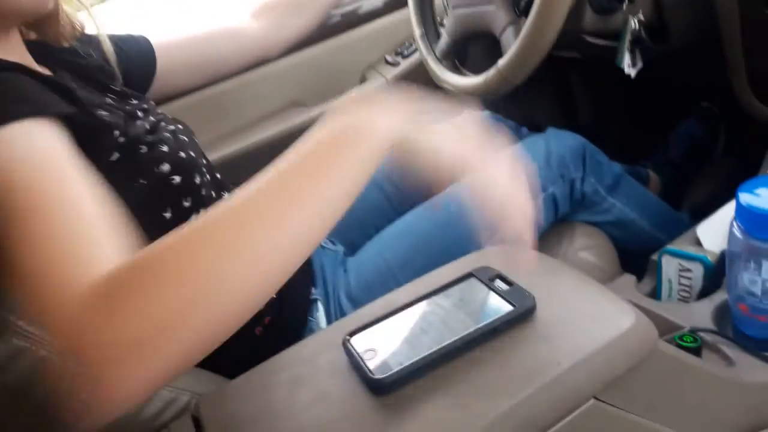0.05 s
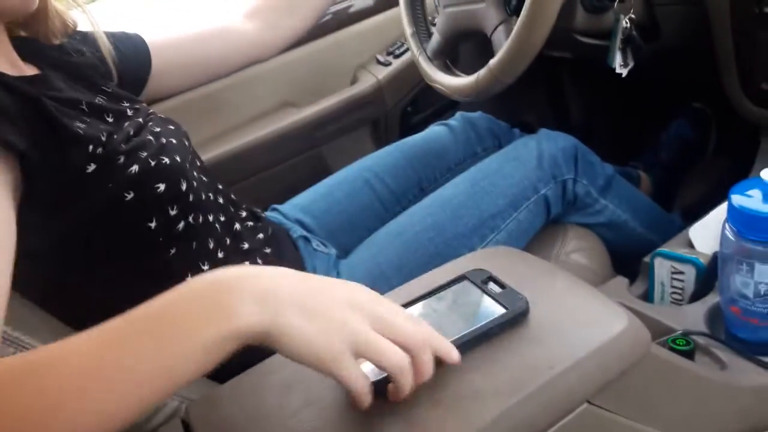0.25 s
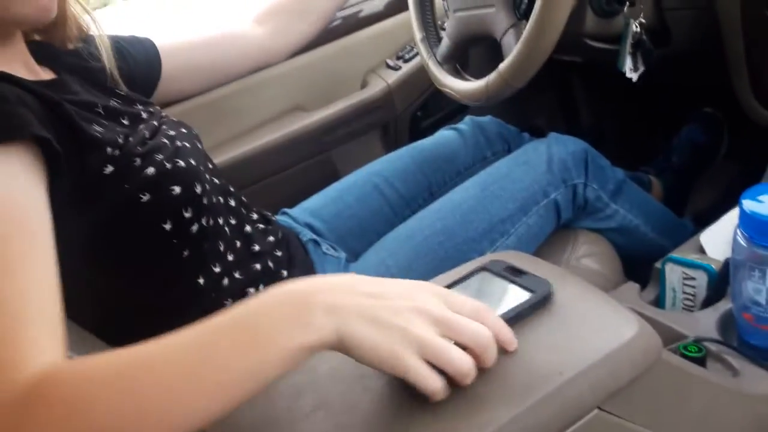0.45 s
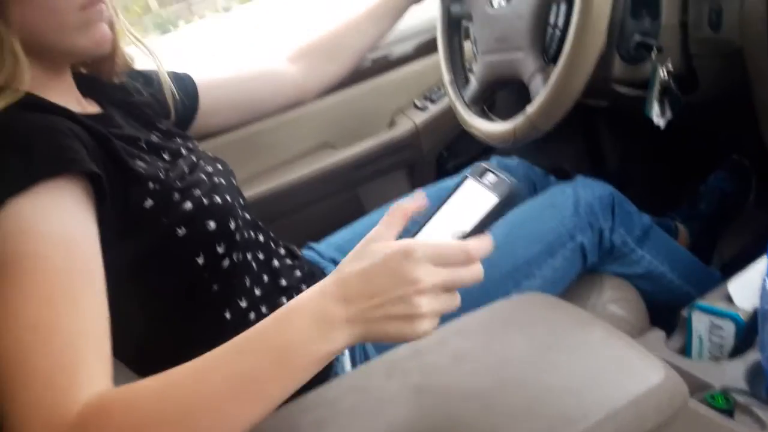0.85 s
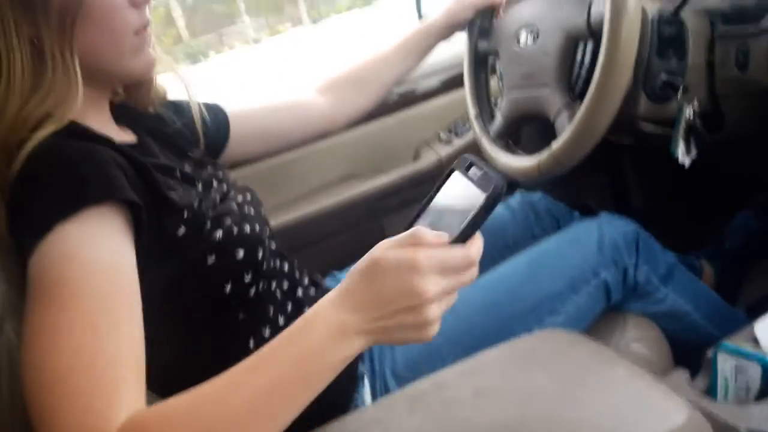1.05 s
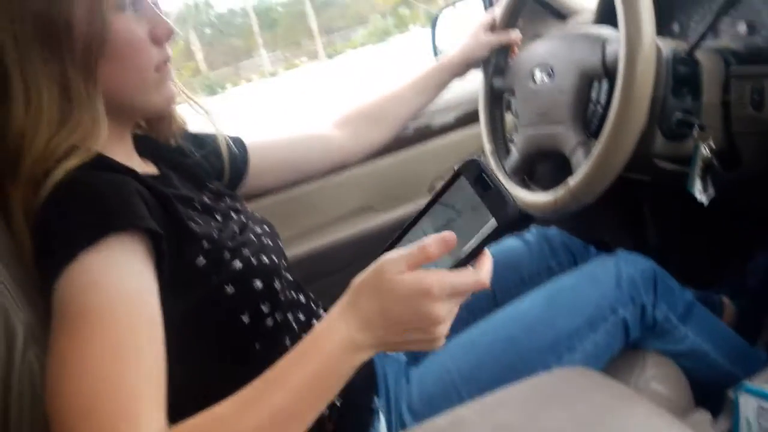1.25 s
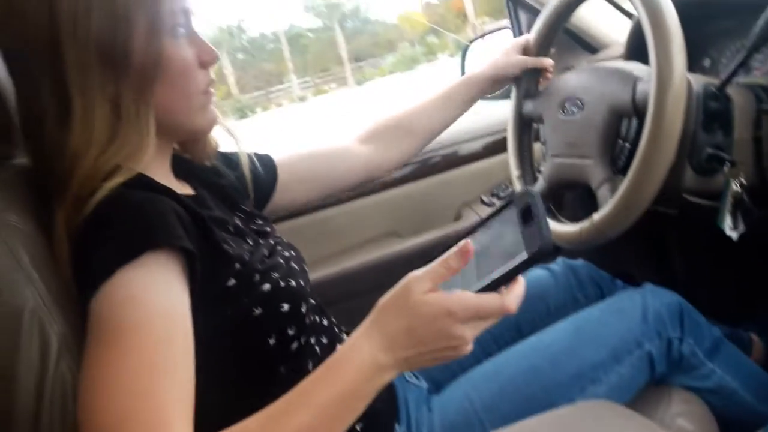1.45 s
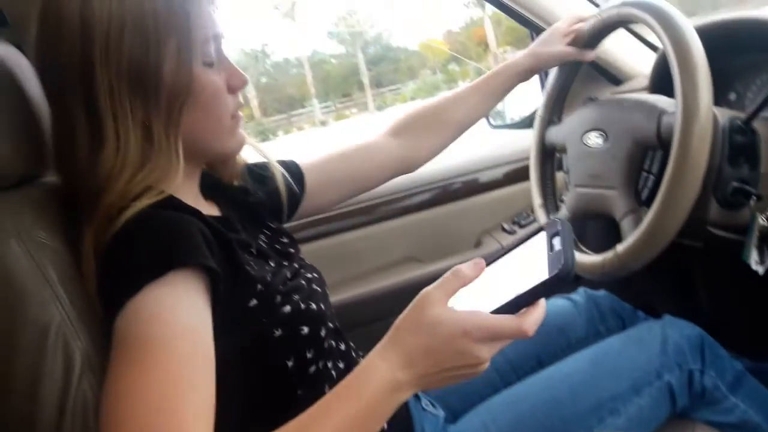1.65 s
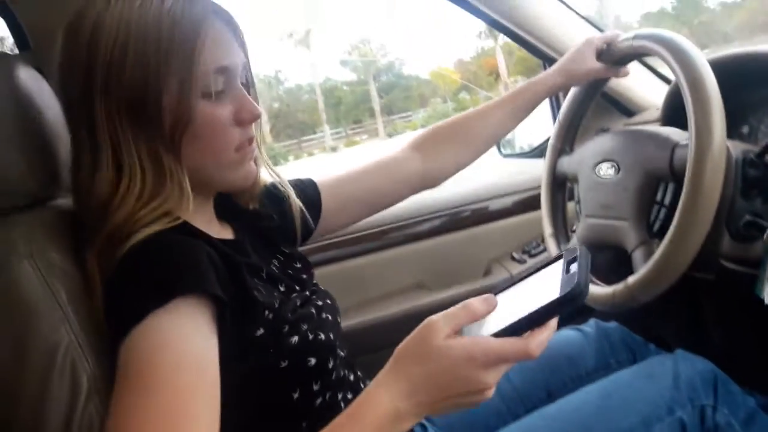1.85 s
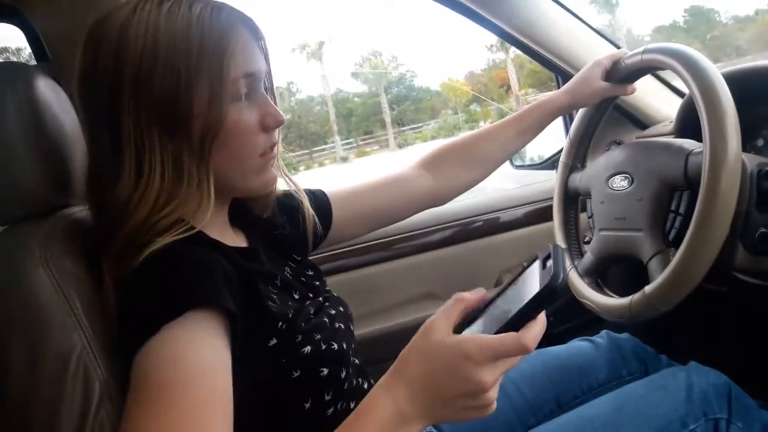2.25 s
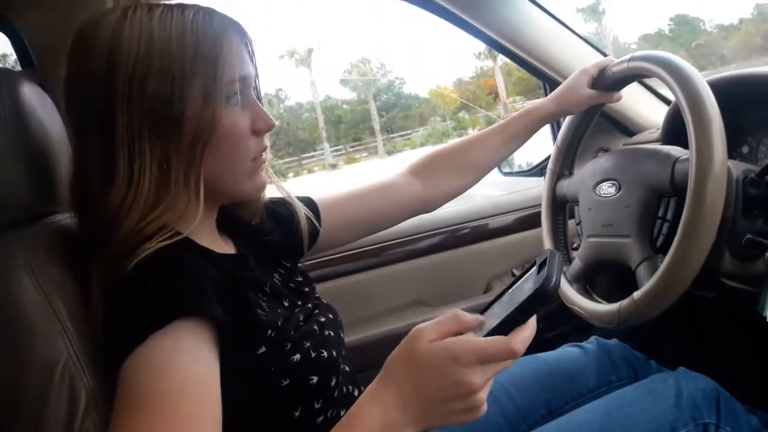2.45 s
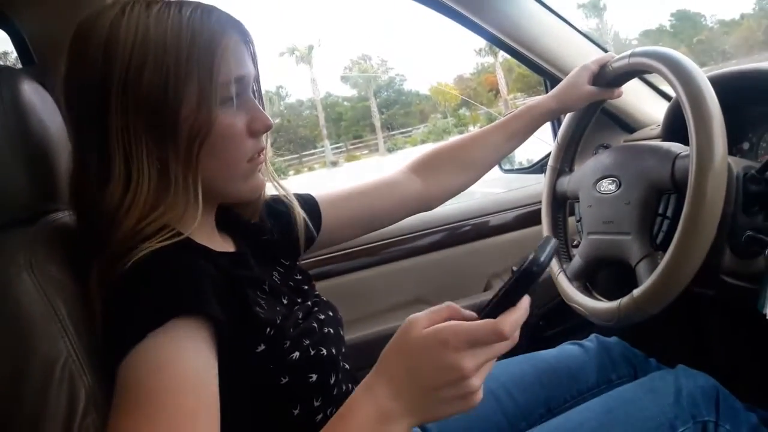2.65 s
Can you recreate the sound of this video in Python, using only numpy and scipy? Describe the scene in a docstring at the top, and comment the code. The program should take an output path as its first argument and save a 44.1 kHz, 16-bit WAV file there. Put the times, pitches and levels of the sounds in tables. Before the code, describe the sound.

A phone is handled close by inside a moving car. At 0.3 seconds a hand lands on it with a dull thud, dragging it in short scrapes across a padded console and lifting it with a bump near 0.8. Faint hollow bumps follow, then plastic clicks and a knock around 1.6 and more clicks at 2.1. Three light taps come from 2.4 to 2.8. Engine drone and road rumble continue underneath.

```python
"""A phone handled on the padded console lid of a moving car, heard close by on a stereo microphone.
A hand lands on it, drags it in sticking jerks and lifts it off with a bump.
The plastic case creaks and clicks in the grip, then a thumb taps it three times.
Behind it the engine drones under road rumble; the small, soft cabin adds only brief reflections."""
import sys
import numpy as np
from scipy import signal
from scipy.fft import rfft, irfft
from scipy.io import wavfile
from scipy.ndimage import uniform_filter1d

SR = 44100
rng = np.random.default_rng(int(sys.argv[2]) if len(sys.argv) > 2 else 0)


def transcribe(signal):
    """Save signal, clipped to [-1, 1], as a 16-bit WAV file at the path in sys.argv[1]."""
    frames = np.atleast_2d(signal).T
    limited = np.clip(frames, -1, 1)
    pcm = np.round(limited * 32767).astype(np.int16)
    wavfile.write(sys.argv[1], SR, pcm)


N = 123479
T = np.arange(N) / SR
HZ = np.maximum(np.fft.rfftfreq(N, 1 / SR), 1)


# low thuds of the padding (t/s, level/dB, f/Hz, t60/s)
LID_THUDS = [(0.3, -15, 80, 0.15), (0.324, -23, 119.1, 0.32), (0.392, -25, 233, .055),
             (0.405, -30, 99.4, 0.14), (0.496, -34, 99, 0.53), (0.661, -24, 146.8, 0.098),
             (0.7647, -16, 140, 0.045), (0.7722, -13, 130, 0.11), (0.81, -23, 106.3, 0.11),
             (1.664, -15, 127, 0.031)]
# knocks of hand and phone (t/s, lid level/dB, phone level/dB, hardness/dB per octave)
LID_KNOCKS = [(0.2894, -32, -44.5, 17.5), (.303, -30.5, -42, -16), (.308, -36, -48, -2),
              (.32, -28, -46, -7), (0.329, -26, -52, -2.5), (0.346, -46, -41.5, 2), (0.362, -34.5, -50, -1),
              (.395, -33, -52, 6.5), (.404, -22.5, -33, -3), (.489, -30, -44.5, 0.5),
              (0.664, -35, -59, 3.5), (0.7593, -36, -34, 23.5), (0.7638, -29.5, -63, -1.5),
              (0.7713, -57, -49, 31), (0.784, -54, -49, 26), (1.663, -38.5, -46, 2)]
# modes of the hollow lid (f/Hz, level/dB, t60/s)
LID_MODES = [(176, 5, 0.024), (255, 0.5, 0.051), (358, -8.5, 0.053), (449, -0.5, 0.019), (572, -7.5, 0.023),
             (707, -14.5, 0.02)]
# modes of the phone knocking on it (f/Hz, level/dB, t60/s)
PHONE_MODES = [(685, 10, 0.009), (990, 2, 0.019), (1122, -1.5, 0.034), (1240, -11, 0.039),
               (1408, -8, 0.034), (1530, -8.5, 0.031), (1940, -35, 0.037), (2740, -31.5, 0.0082)]

def phone_on_lid():
    """The padded lid thuds and rings hollow; the phone clacks against it."""
    thuds, knocks = np.zeros((2, N))
    for start, db, hz, t60 in LID_THUDS:
        add(thuds, start, soft_blow(db, hz, t60, rise_s=0.0042))
    for start, lid_db, phone_db, hardness in LID_KNOCKS:
        hollow = undb(lid_db) * ring(LID_MODES, scatter=0.055, tilt_db=hardness)
        clack = undb(phone_db) * ring(PHONE_MODES, scatter=0.008, tilt_db=hardness)
        add(knocks, start, hollow + clack)
    low_cut = signal.butter(2, 55, "high", fs=SR, output="sos")
    return signal.sosfilt(low_cut, thuds) + cabin(knocks)


# slides of phone and fingers (t/s, length/s, level/dB, tilt/dB per octave)
SLIDE_STROKES = [(0.291, 0.1, -48, 2.5), (0.348, 0.048, -51.5, 6), (0.477, 0.034, -47.5, 4),
                 (0.516, 0.19, -60.5, 7), (0.656, 0.03, -62.5, 6), (0.722, 0.083, -57.5, 5.5),
                 (1.552, 0.22, -63.5, 5.5), (1.749, 0.056, -67.5, 13.5), (1.875, 0.045, -65.5, 10)]
# spectrum of the rubbing (f/Hz, level/dB)
RUB_SPECTRUM = [(150, -12), (450, 15.5), (750, 2), (1050, 6.5), (1250, 1.5), (1550, -1), (1800, -6.5),
                (2700, -11.5), (3800, -24), (5400, -34), (7000, -30.5), (8200, -38.5), (16000, -55)]

def slides(grains_per_s=2500):
    """Stick-slip grains as the phone drags over the lid and skin rubs the case."""
    out = np.zeros(N)
    for start, length, db, tilt_db in SLIDE_STROKES:
        grains = (rng.random(N) < grains_per_s / SR) * rng.choice([-1, 1], N)
        sizes = undb(-3 * np.minimum(rng.exponential(size=N), 4))
        pressure = press(start, length, edge_s=0.03)
        out += undb(db) * pressure * unit(colour(grains * sizes, RUB_SPECTRUM, tilt_db))
    return cabin(out)


# the phone catching on the lid (t/s, length/s, level/dB, tilt/dB per octave)
CATCHES = [(0.333, 0.047, -52, -17), (0.595, 0.014, -60, 2), (0.641, 0.031, -56.5, 5.5),
           (0.733, .022, -58.5, -13)]
# modes rung by the catching (f/Hz, level/dB, t60/s)
CATCH_MODES = [(1260, -12, 0.016), (1485, 0, 0.031), (1600, -15, .015), (2580, -11, .015)]

def rasps(slips_per_s=360):
    """The phone sticks and slips in quick, uneven jerks, each ringing its body."""
    out = np.zeros(N)
    for start, length, db, tilt_db in CATCHES:
        jitter, size_db = rng.standard_normal((100, 2)).T
        slip_samples = np.cumsum(np.exp(.4 * jitter)) * SR / slips_per_s
        slips = np.zeros(N)
        slips[slip_samples.astype(int) % N] = undb(size_db)
        body = ring(CATCH_MODES, scatter=0.042, tilt_db=tilt_db)
        rasp = signal.fftconvolve(slips * press(0, length, edge_s=0.0085), body)[:N]
        rms = np.sqrt(np.sum(rasp ** 2) / (length * SR))
        add(out, start, undb(db) * rasp / rms)
    return cabin(out)


# clicks of the case (t/s, level/dB, tilt/dB per octave, t60/s)
CASE_CLICKS = [(0.0496, -47, 2, 0.067), (0.3, -42, -3, 0.27), (0.394, -41.5, -3.5, 0.17),
               (.493, -45, 2, 0.12), (0.6349, -41, -5, 0.04), (0.7229, -39, -6, 0.067),
               (0.765, -49.5, 6.5, 0.06), (1.5448, -41, -2, 0.057), (1.572, -47.5, -3, 0.11),
               (1.611, -54, 1, 0.13), (1.6482, -39, -1.5, 0.086), (1.665, -54, 4.5, 0.18),
               (2.095, -40.5, -0.5, 0.029), (2.104, -44.5, -1, 0.065), (2.2405, -50.5, -5.5, 0.1)]
# spectrum of a click (f/Hz, level/dB)
CLICK_SPECTRUM = [(300, 4), (900, -9), (1500, 3), (2700, -1), (3700, -8), (4600, -7.5), (5400, -14),
                  (6300, -8.5), (7300, -9), (8200, -17), (11000, -21.5), (16000, -30.5)]
# modes of the plastic (f/Hz, level/dB, t60/s)
PLASTIC_MODES = [(2150, -8, 0.043), (2640, -6, 0.09), (2930, 2, 0.03)]

def case_clicks():
    """The plastic case clicks and rings briefly as the grip shifts."""
    out = np.zeros((2, N))
    for start, db, tilt_db, t60 in CASE_CLICKS:
        click = crack(CLICK_SPECTRUM, t60, tilt_db)
        ringing = undb(-15.5) * ring(PLASTIC_MODES, scatter=0.029)
        add(out, start, undb(db) * (click + ringing))
    return out


# taps on the phone (t/s, level/dB)
THUMB_TAPS = [(2.4247, -40), (2.5641, -50.5), (2.751, -48)]
# spectrum of a tap's snap (f/Hz, level/dB)
TAP_SPECTRUM = [(600, -44), (1000, -10), (1300, 3.5), (1850, 9), (2700, 2), (3600, -9), (5000, -30),
                (7000, -25.5), (12000, -55)]
# modes rung by a tap (f/Hz, level/dB, t60/s)
TAP_RING = [(1798, 4, 0.06), (2110, -6, 0.041), (1300, -3, 0.039)]

def thumb_taps():
    """Light taps of the thumb, centred at the microphone: a short snap and a pitched ring."""
    out = np.zeros((2, N))
    for start, db in THUMB_TAPS:
        snap = undb(1) * crack(TAP_SPECTRUM, t60=.05)
        add(out, start, undb(db) * (snap + ring(TAP_RING, scatter=0.0071)))
    return out


# engine speed and load (t/s, crankshaft f/Hz, level/dB)
ENGINE_RUN = [(0, 34.3, -71), (.12, 34.4, -52.5), (.26, 34.45, -41.5), (0.601, 34.6, -43),
              (0.901, 34.5, -39.5), (1.198, 34.3, -38.5), (1.549, 34.15, -45.5), (1.9, 34.2, -42),
              (2.35, 34.15, -41), (2.6, 34.05, -45.5), (2.8, 34.1, -48.5)]
# engine orders (multiple of the crankshaft rate, relative level/dB, flutter/dB)
ENGINE_ORDERS = [(4, 2.5, 0.8), (5, -13.5, 6), (7, -22, 5), (12, -29.5, 2.5), (14, -35.5, 3)]
# octave above the firing note (t/s, relative level/dB)
FIRING_OCTAVE = [(0, -26), (.8, -17), (1.25, -13.5), (1.45, -15), (1.7, -22), (2.8, -25)]

def engine():
    """Crankshaft orders heard from inside the car; the firing order and its octave boom."""
    times, crank_hz, load_db = np.array(ENGINE_RUN).T
    crank_angle = 2 * np.pi * np.cumsum(np.interp(T, times, crank_hz)) / SR
    drone = np.zeros(N)
    for order, db, flutter in ENGINE_ORDERS:
        gain = undb(db + flutter * walk(12))
        phase = 0.31 * flutter * walk(16) + rng.uniform(0, 2 * np.pi)
        drone += gain * np.sin(round(order) * crank_angle + phase)
    octave_db = np.interp(T, *np.array(FIRING_OCTAVE).T) + 2 * walk(15)
    drone += undb(octave_db) * np.sin(8 * crank_angle + .75 * walk(20))
    return np.sqrt(2) * drone * undb(np.interp(T, times, load_db)) * pan(left_db=.5)


# spectrum of the car body's rumble (f/Hz, level/dB)
RUMBLE_SPECTRUM = [(20, -24), (40, -2), (65, 9.5), (78, -5.5), (100, 6.5), (160, 5.5), (250, -5), (330, -7),
                   (450, -45)]
# spectrum of the tyres from inside (f/Hz, level/dB)
TYRE_SPECTRUM = [(150, -58), (190, -38.5), (330, -0.5), (494, -1), (702, -8.5), (1040, -11), (1550, -14),
                 (2350, -17.5), (3480, -26.5), (7400, -41.5), (9620, -76), (16300, -130)]
# course of the tyre noise (t/s, level/dB)
TYRE_LEVEL = [(0, -55), (.2, -56), (1.55, -56.5), (2.3, -57), (2.8, -56.5)]

def road():
    """Steady body rumble and flickering tyre noise, all around the microphone."""
    rumble = undb(-50.5) * unit(colour(diffuse(), RUMBLE_SPECTRUM))
    tyres = unit(colour(diffuse(), TYRE_SPECTRUM))
    tyre_db = np.interp(T, *np.array(TYRE_LEVEL).T) + 1.5 * walk(15)
    return rumble + undb(tyre_db) * tyres


# bumps somewhere in the cabin (t/s, level/dB, f/Hz, t60/s)
CABIN_BUMPS = [(1.043, -34, 554, 0.022), (1.19, -32.5, 246, 0.11), (1.247, -45.5, 853, 0.055),
               (1.253, -45, 597, 0.11), (1.714, -41.5, 594, 0.043)]

def bumps():
    """Faint hollow bumps, perhaps loose things in the moving car."""
    out = np.zeros(N)
    for start, db, hz, t60 in CABIN_BUMPS:
        add(out, start, soft_blow(db, hz, t60, rise_s=0.0013))
    return cabin(out)


def cabin(x):
    """Direct sound, then a short flurry of reflections from the nearby surfaces."""
    tail = diffuse(width_hz=300) * fade(t60=0.074) * (T > .002)
    tail /= np.sqrt(np.sum(tail ** 2) / 2)
    return x + undb(-4) * signal.fftconvolve(np.atleast_2d(x), tail, axes=1)[:, :N]


def soft_blow(db, hz, t60, rise_s):
    """One resonance pushed by a padded contact."""
    return undb(db) * (1 - np.exp(-T / rise_s)) * fade(t60) * np.sin(2 * np.pi * hz * T)


def ring(modes, scatter, tilt_db=0, contact_s=0.00078):
    """Decaying modes, detuned at each point of contact; a harder contact favours the high ones."""
    t, out = T[:SR // 3], np.zeros(N)
    for k, (hz, db, t60) in enumerate(modes):
        detune = 1 + scatter * rng.standard_normal()
        envelope = undb(db + tilt_db * np.log2(hz) - 60 * t / t60)
        out[:len(t)] += (-1) ** k * envelope * np.sin(2 * np.pi * hz * detune * t)
    return burst(out * np.tanh(T / contact_s) ** 2)


def crack(spectrum, t60, tilt_db=0, snap_share=0.2, rise_s=0.00032):
    """A sharp snap followed by a dense, short ring."""
    snap = diffuse() * fade(t60=.005)
    tail = diffuse() * fade(t60) * (1 - np.exp(-T / rise_s))
    noise = np.sqrt(snap_share) * unit(snap) + np.sqrt(1 - snap_share) * unit(tail)
    return burst(colour(noise, spectrum, tilt_db))


def press(start, length, edge_s):
    """Contact pressure ramping on and off."""
    return np.clip(np.minimum(T - start, start + length - T) / edge_s + .5, 0, 1)


def diffuse(width_hz=680, bass_width=0.15):
    """Stereo noise: alike in the bass, unrelated above width_hz."""
    mid, side = rng.standard_normal((2, N))
    width = np.hypot(HZ, bass_width * width_hz) / np.hypot(HZ, width_hz)
    side = irfft(rfft(side) * width, N)
    return np.array([mid + side, mid - side])


def colour(x, spectrum, tilt_db=0):
    """Causal filter through (f/Hz, level/dB) points, tilted per octave."""
    hz, db = np.array(spectrum).T
    octaves = np.log2(np.clip(HZ, 500, 7160) / 1000)
    gain = undb(np.interp(np.log(HZ), np.log(hz), db) + tilt_db * octaves)
    cepstrum = irfft(np.log(gain), N)
    cepstrum[1:N // 2] *= 2  # fold to minimum phase
    cepstrum[N // 2:] = 0
    return irfft(rfft(x) * np.exp(rfft(cepstrum)), N)


def walk(rate_hz):
    """Smooth random wander, spread near 1."""
    hold = int(SR / rate_hz)
    steps = rng.standard_normal(500)[np.arange(N) // hold]
    return 1.3 * uniform_filter1d(uniform_filter1d(steps, hold), hold)


def fade(t60):
    """Exponential decay, 60 dB in t60 seconds."""
    return np.exp(-np.minimum(np.log(1000) * T / t60, 100))


def burst(x):
    """Scale so that the first 5 ms have the power of a sine of peak 1."""
    return x / np.sqrt(2 * np.mean(x[..., :SR // 200] ** 2))


def unit(x):
    """Scale to rms 1."""
    return x / np.sqrt(np.mean(x ** 2))


def undb(db):
    """Decibels to gain."""
    return 10 ** (np.asarray(db) / 20)


def pan(left_db):
    """Left and right gains, left_db apart."""
    return undb(np.array([[left_db], [-left_db]]) / 2)


def add(out, start, x):
    """Mix x in from start seconds."""
    i = max(int(start * SR), 0)
    out[..., i:] += x[..., :N - i]


def scene():
    """The phone up close, its handling just left of centre, over the drone of the car."""
    handling = (slides() + rasps() + case_clicks()) * pan(left_db=1)
    return phone_on_lid() + handling + thumb_taps() + engine() + road() + bumps()


# spectrum of the microphone's steady hiss (f/Hz, level/dB)
MIC_HISS = [(3000, -2.5), (7400, -0.5), (8200, -10), (11000, -0.5), (13000, 2.5), (15500, 4)]

def record(dry):
    """The level comes up half a decibel at the start; the microphone hisses, the recorder cuts the top."""
    opening = undb(-0.5 * np.exp(-T / 0.93))
    hiss = undb(-74.5) * unit(colour(rng.standard_normal((2, N)), MIC_HISS))
    high_cut = signal.ellip(10, .2, 80, 15750, fs=SR, output="sos")
    return signal.sosfilt(high_cut, dry * opening + hiss)


dry = scene()
out = record(dry)
transcribe(out)
```